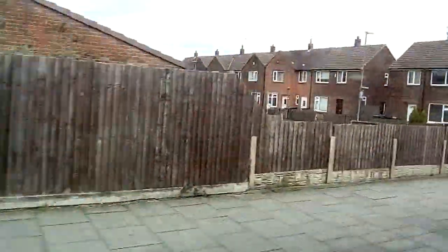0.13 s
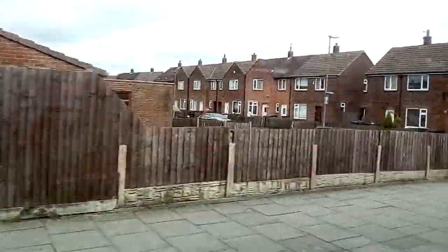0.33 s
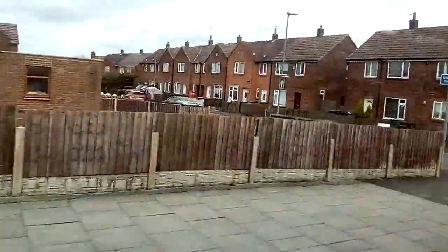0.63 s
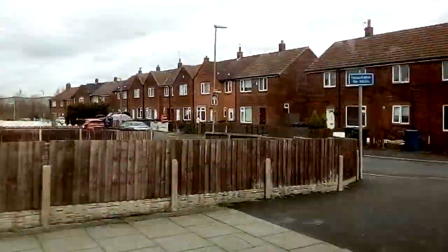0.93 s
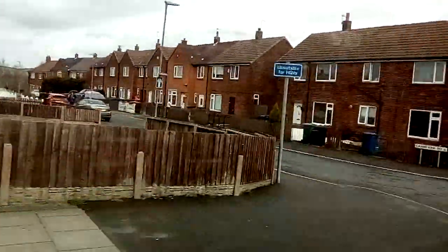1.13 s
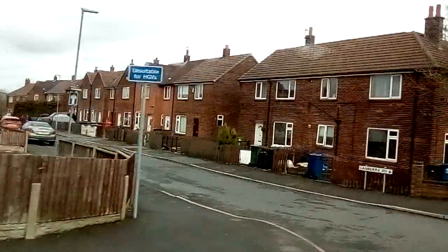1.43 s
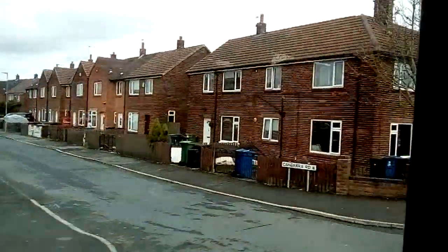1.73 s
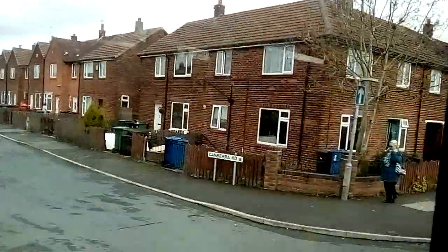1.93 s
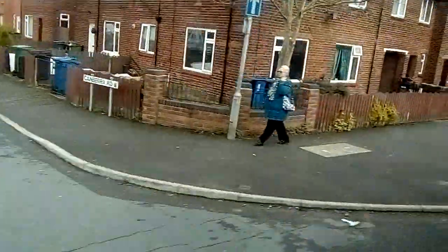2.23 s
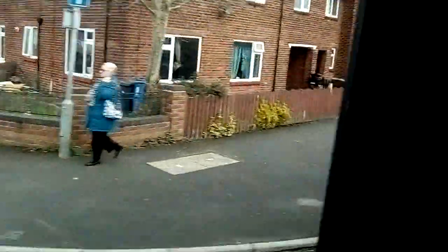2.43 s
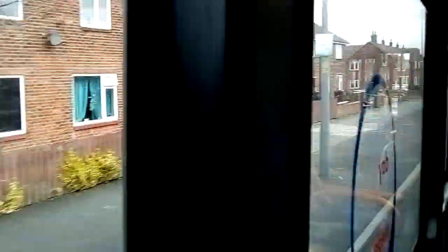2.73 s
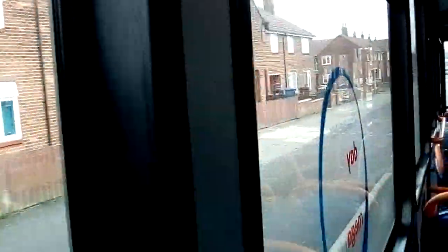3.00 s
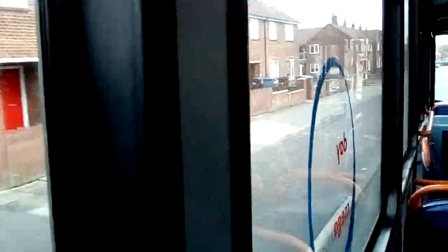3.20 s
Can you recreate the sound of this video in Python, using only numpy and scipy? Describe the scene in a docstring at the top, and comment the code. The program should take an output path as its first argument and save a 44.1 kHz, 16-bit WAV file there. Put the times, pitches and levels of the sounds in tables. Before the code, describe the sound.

A bus diesel engine drones low and steady inside the cabin over booming road rumble; panels and windows rattle busily at first, then ease, with faint high squeaks midway, picked up close in stereo from a seat.

```python
"""The diesel of a bus drones in low shaft orders as it rolls slowly round a corner, heard from inside.
The road booms through the floor and roars in the cabin: shaped noise with drifting patches.
Loose panels and windows rattle over bumps: dense random clicks ring a panel response and a short tail.
Faint squeaks are narrow tones with a little resonant noise.
Two microphone ports: the left one is nearer and brighter."""
import sys
import numpy as np
from scipy import signal
from scipy.fft import rfft, irfft, next_fast_len
from scipy.io import wavfile
from scipy.ndimage import uniform_filter1d

SR = 44100
rng = np.random.default_rng(int(sys.argv[2]) if len(sys.argv) > 2 else 0)


def dump_mix(stems):
    """Bounce the given channels to the path in sys.argv[1] as a 16-bit WAV at rate SR."""
    frames = np.atleast_2d(stems).T  # one column per channel
    limited = np.clip(frames, -1, 1)  # hard clip at full scale
    pcm = np.round(limited * 32767).astype(np.int16)
    wavfile.write(sys.argv[1], SR, pcm)


def convert_level_to_amplitude(level_db):
    """Map a level in decibels to its linear amplitude factor."""
    exponent = np.asarray(level_db, float) / 20
    return 10 ** exponent


N = 148176
T = np.arange(N) / SR


def evened(x):
    """Scales to rms 1."""
    return x / np.sqrt(np.mean(x ** 2) + 1e-20)


def read(points, hz):
    """Interpolates a spectrum table on a log frequency axis."""
    f, value = np.transpose(points)
    return np.interp(np.log(hz + 1), np.log(f + 1), value)


def curve(table, axis):
    """One column of a time table, interpolated per sample."""
    table = np.array(table)
    return np.interp(T, table[:, 0], table[:, axis])


def slow(top_hz):
    """Random fluctuation of rms 1, rolled off above top_hz."""
    z = rfft(rng.standard_normal(N))
    rolloff = 1 + (np.fft.rfftfreq(N, 1 / SR) / top_hz) ** 4
    return evened(irfft(z / rolloff, N))


def wash(colour, patchy_db, size):
    """Two unrelated noises of one colour with shared drifting patches; joint rms 1."""
    hop = size // 4
    frames, hz = N // hop + 5, np.fft.rfftfreq(size, 1 / SR)
    a, b, c, d, patches = rng.standard_normal((frames, len(hz), 5)).T
    patches = uniform_filter1d(patches, size=12, axis=0)  # along frequency
    patches = evened(uniform_filter1d(patches, size=10, axis=1))  # along time
    gain = convert_level_to_amplitude(read(colour, hz)[:, None] + patchy_db * patches)
    z = np.array([a + 1j * b, c + 1j * d]) * gain
    return evened(signal.istft(z, nperseg=size, noverlap=size - hop)[1][:, :N])


def engine():
    """Sine orders of one drifting shaft speed, each wavering in level; order 8 swells once."""
    # Each row: time in seconds, base order in Hz before drift.
    speed = [(0, 42.5), (.4, 41.9), (.65, 42.4), (1.2, 41.9), (1.8, 41.4), (2.6, 41.2), (3.1, 40.9),
             (3.36, 40.4)]
    # Each row: time in seconds, then rms levels of order 3 (boom), order 4 and order 6 (drone) in dB,
    # before waver.
    main_orders = [(0.05, -37.5, -50, -17), (0.09, -21.5, -22, -17.5), (0.25, -25.5, -27.5, -17),
                   (0.41, -22.5, -26.5, -18.5), (0.49, -34, -32, -33), (0.56, -41.5, -24.5, -18),
                   (0.66, -25.5, -34, -20.5), (0.76, -22, -22, -22), (0.84, -36, -32.5, -18.5),
                   (1.22, -41, -17, -22.5), (1.28, -10.5, -38.5, -19.5), (1.33, -28.5, -22.5, -23),
                   (1.48, -26, -32, -18.5), (1.65, -24.5, -23, -24.5), (1.92, -28.5, -34, -22),
                   (2.11, -22, -26, -25.5), (2.81, -24, -26.5, -27), (2.99, -21.5, -68.5, -23),
                   (3.15, -27, -22, -25), (3.2, -19, -30.5, -36), (3.24, -19.5, -38.5, -23),
                   (3.3, -22, -23.5, -24.5)]
    # Weaker orders. Each row: multiple of the base order, rms level in dB before waver and swell.
    weak_orders = [(1, -34), (1.5, -34), (2, -28.5), (5, -39.5), (8, -41), (9, -44), (12, -46.5)]
    drift_fraction, drift_hz = 0.0062, 5
    waver_db, waver_hz = 0.5, 15.8
    swell_s, swell_length_s, swell_peak_db = 0.97, 0.038, 17

    base_hz = curve(speed, axis=1) * (1 + drift_fraction * slow(drift_hz))
    turns = 2 * np.pi * np.cumsum(base_hz) / SR
    swell_db = swell_peak_db * np.exp(-((T - swell_s) / swell_length_s) ** 2)
    orders = [(k, curve(main_orders, axis)) for axis, k in enumerate((3, 4, 6), 1)] + weak_orders
    out = np.zeros(N)
    for k, db in orders:
        order_db = db + (k == 8) * swell_db + waver_db * slow(waver_hz)
        out += np.sqrt(2) * convert_level_to_amplitude(order_db) * np.sin(k * turns + 2 * np.pi * rng.random())
    return out


def road():
    """Floor boom following the road surface plus cabin roar swelling with load, both shaped noise."""
    # Road under the wheels. Each row: time in seconds, roughness in dB before boom_db.
    surface = [(0.0, -22), (0.21, -33), (0.32, -25), (0.43, -19), (0.54, -20.5), (1.08, -19.5),
               (1.09, -21.5), (1.71, -21), (1.88, -26), (2.08, -20), (2.19, -28.5), (3.12, -24.5),
               (3.14, -17), (3.18, -23.5), (3.31, -29.5), (3.36, -27.5)]
    # Floor boom spectrum. Each row: frequency in Hz, relative density in dB per Hz.
    floor = [(20, -22.5), (40, -11), (75, 2), (110, 3), (160, -1), (220, -3), (330, -18), (450, -15.5),
             (700, -60), (1500, -120)]
    # Roar over time. Each row: time in seconds, level in dB before roar_db.
    load = [(0.05, -31), (0.23, -33.5), (0.98, -34), (1.33, -30), (1.56, -33), (1.75, -34), (2.03, -32.5),
            (2.99, -33), (3.3, -34.5)]
    # Cabin roar spectrum. Each row: frequency in Hz, relative density in dB per Hz.
    roar_colour = [(150, -31), (260, -4), (291, -6), (443, -20.5), (496, -15), (666, -18), (988, -22),
                   (1270, -29), (3040, -38.5), (3910, -46), (6310, -50), (7470, -64.5), (9710, -95),
                   (16400, -120)][:-2] + [(8200, -69), (10400, -69.5), (13900, -77), (14500, -65),
                   (15600, -67.5), (16100, -73.5)]
    boom_db, roar_db = 2, 4.5

    boom = convert_level_to_amplitude(curve(surface, axis=1) + boom_db) * wash(floor, patchy_db=1.4, size=2048)
    roar = convert_level_to_amplitude(curve(load, axis=1) + roar_db) * wash(roar_colour, patchy_db=1.7, size=1024)
    return boom + roar


def clack():
    """One minimum-phase panel knock of unit energy, split into body, middle and bright parts."""
    # Panel ringing. Each row: frequency in Hz, relative density in dB per Hz.
    panel = [(200, -33.5), (350, -10.5), (500, -11.5), (700, -11.5), (900, -12), (1100, -15), (1350, -18),
             (1550, -17), (1720, -11.5), (1880, -17), (2050, -19.5), (2400, -22), (3000, -21), (3600, -27),
             (4200, -33.5), (5500, -38.5), (6700, -39.5), (7500, -48.5), (8400, -56.5), (10200, -57),
             (13400, -64), (14900, -56.5), (16100, -64)]
    body_hz, bright_hz = 1300, 3800

    hz = abs(np.fft.fftfreq(4096, 1 / SR))
    low = 1 / (1 + (hz / body_hz) ** 8)
    high = 1 - 1 / (1 + (hz / bright_hz) ** 8)
    gain = convert_level_to_amplitude(np.maximum(read(panel, hz), -100))
    causal = np.exp(np.conj(signal.hilbert(np.log(gain))))
    tick = causal / np.sqrt(np.mean(gain ** 2))
    parts = np.fft.ifft(tick * np.array([low, 1 - low - high, high])).real
    return np.roll(parts, 32, axis=1)[:, :2048]  # room for the split's pre-ringing


def clicks(per_s, spread_db):
    """Dense random-sign clicks with exponentially spread dB levels, so a few are large; rms 1."""
    draw = rng.random((3, N))
    sign = (draw[0] < per_s / SR) * np.sign(draw[1] - .5)
    return evened(sign * convert_level_to_amplitude(-spread_db * np.log(draw[2] * .99 + .01)))


def cabin(x):
    """Short noise tails, crossfaded in rotation through six random pairs: no one colours every knock."""
    t60_s, shifts_per_s, gap_s = 0.061, 9.5, .001
    t = np.arange(SR // 4) / SR
    tails = rng.standard_normal((6, 2, len(t))) * convert_level_to_amplitude(-60 * t / t60_s) * (t > gap_s)
    tails /= np.linalg.norm(tails[0, 0])
    phase = (shifts_per_s * T - np.arange(6)[:, None]) % 6 - 1
    share = np.cos(np.pi / 2 * np.clip(phase, -1, 1))
    return signal.oaconvolve((x * share)[:, None], tails, axes=2)[:, :, :N].sum(0)


def rattles():
    """Click bursts over bumps and a rising and falling trim rattle ring the panels and a short tail."""
    # Each row: start in seconds, level in dB before rattle_db, Gaussian decay length in seconds,
    # extra brightness in dB, extra body in dB.
    bumps = [(0.038, -25.5, 0.015, -11, 2.3), (0.277, -28.5, 0.04, -4, 1.2), (0.319, -29, .015, 9, 3.5),
             (0.426, -26.5, 0.022, -5.5, 0.5), (0.459, -26, 0.033, -2, -0.5), (0.515, -23, .035, -4.5, -1),
             (0.535, -26, 0.046, 1, -5.5), (0.626, -31, 0.017, -5, 6.5), (0.716, -28.5, 0.026, 5.5, 3.5),
             (0.778, -26.5, 0.023, 8.5, -0.5), (0.809, -29, 0.023, 4.5, -7.5), (0.817, -27, 0.037, 7, -7.5),
             (0.942, -21.5, 0.0084, 0, -8.5), (1.021, -32, .03, -1.5, 0.5), (1.078, -25.5, .025, 4.5, 6),
             (1.101, -30.5, 0.02, 0.5, -4.5), (1.137, -23.5, 0.029, 5, 1.5), (1.188, -27.5, 0.016, 0, -2),
             (1.218, -23, .03, -1, 3.5), (1.25, -26.5, 0.035, 4.5, -1), (1.303, -27.5, 0.024, -2.5, -1),
             (1.355, -23, .023, -5, -1), (1.376, -24.5, .045, 2.5, -0.7), (1.442, -20.5, 0.043, 0.5, -4),
             (1.466, -29.5, 0.073, 6, -2), (1.582, -30.5, 0.015, 5, -10.5), (1.75, -36, .03, 9.5, -6.5),
             (1.8365, -34, .06, 6.5, 0.5), (1.906, -31.5, .03, 6, 6), (2.145, -33, 0.015, -1, 8),
             (2.341, -37.5, 0.013, 0, 10), (2.7052, -24.5, 0.009, 5.5, 9), (2.7127, -24, 0.02, 4.5, -1),
             (2.987, -34, 0.013, -3.5, 5)]
    # Continuous loose trim rattle. Each row: time in seconds, drive level in dB.
    trim = [(0.08, -45.5), (0.31, -51), (0.64, -45), (0.87, -47), (1.08, -40), (1.26, -37.5), (1.36, -45),
            (1.52, -50), (1.68, -58), (2.08, -43), (2.38, -46.5), (2.88, -52), (3.3, -45.5)]
    rattle_db, first_db, rise_s = -8, 16, .001  # first_db: opening knock over its burst
    tail_gain = convert_level_to_amplitude(-2.4)

    burst, first = np.zeros((3, N)), np.zeros((3, N))
    for start_s, db, length_s, bright_db, body_db in bumps:
        bands = convert_level_to_amplitude(db + rattle_db + np.array([[body_db], [0], [bright_db]]))
        u = np.maximum(T - start_s, 0)
        burst += bands ** 2 * np.minimum(u / rise_s, 1) * np.exp(-(u / length_s) ** 2)
        first[:, round(start_s * SR)] = bands[:, 0] * convert_level_to_amplitude(first_db)
    drive = first + np.sqrt(burst) * clicks(per_s=1100, spread_db=3.5)
    drive += convert_level_to_amplitude(curve(trim, axis=1)) * clicks(per_s=1500, spread_db=2.5)
    direct = signal.oaconvolve(drive, clack(), axes=1)[:, :N].sum(0)
    tail = cabin(direct)
    return np.array([direct + tail_gain * tail[0], np.hypot(1, tail_gain) * tail[1]])


def resonate(x, hz, width_hz):
    """A fixed one-pole resonance of gain 1, run at baseband."""
    turn = np.exp(2j * np.pi * hz * np.arange(len(x)) / SR)
    r = np.exp(-np.pi * width_hz / SR)
    return 2 * (turn * signal.lfilter([1 - r], [1, -r], x / turn)).real


def squeaks():
    """Short chirps of something rubbing: fixed-pitch sines roughened by narrow resonant noise."""
    # Each row: start in seconds, length in seconds, tone level in dB, pitch in Hz.
    chirps = [(1.45, .1, -53, 3600), (1.56, .07, -56, 3600), (1.65, .09, -57, 3600), (1.72, .09, -51, 3598),
              (1.80, .065, -48, 3595), (1.865, .065, -48, 3597), (1.925, .065, -50, 3597),
              (2.01, .05, -53, 3605), (2.13, .07, -56, 3590), (1.85, .16, -57, 2975),
              (2.25, .24, -55, 2975), (2.535, .12, -52, 2970)]
    width_hz, roughness = 33, 0.15

    out, noise = np.zeros(N), rng.standard_normal(N)
    for start_s, length_s, db, hz in chirps:
        shape = np.sin(np.pi * np.clip((T - start_s) / length_s, 0, 1)) ** .6
        tone = np.sqrt(2) * np.sin(2 * np.pi * hz * T)
        tone += roughness * evened(resonate(noise, hz, width_hz))
        out += convert_level_to_amplitude(db) * shape * tone
    return out


def scene():
    """Row 0 is the sound at the seat, row 1 a share only the right port adds (half engine and squeaks)."""
    return road() + rattles() + (engine() + squeaks()) * np.array([[1], [.5]])


def top_cut(x):
    """Nothing passes above the cut-off."""
    return signal.sosfilt(signal.butter(12, 15700, fs=SR, output="sos"), x)


def record(dry):
    """The port pair: likeness, balance and phase lead by frequency, then a band limit."""
    # Each row: frequency in Hz, likeness of the ports from 0 to 1.
    likeness = [(60, 1), (140, 0.89), (240, 1), (340, .9), (520, 0.42), (1000, 0.2), (2000, 0.083),
                (4000, 0.067), (7200, 0.067), (8200, 0.27), (16000, 0.5)]
    # Each row: frequency in Hz, left over right balance in dB.
    balance = [(25, -4.3), (60, 4.5), (100, -1.5), (170, -1.5), (290, -0.3), (500, -2), (850, -3),
               (1440, 2), (2440, 9.5), (4140, 7), (7020, 9), (8400, 4.2), (16000, 2.3)]
    # Each row: frequency in Hz, phase in radians by which the left port leads.
    lead = [(0, 0), (60, .05), (250, .3), (430, .5), (690, 1.1), (1120, 3.2), (1460, 3.9), (2070, 7.0),
            (7200, 23.3), (7900, 8 * np.pi), (22050, 8 * np.pi)]
    edge_hz = 15700

    size = next_fast_len(N + 64)
    hz = np.fft.rfftfreq(size, 1 / SR)
    seat, extra = rfft(dry, size)
    same = np.clip(read(likeness, hz), 0, 1)
    tilt = convert_level_to_amplitude(read(balance, hz) / 2)
    late = np.exp(-1j * np.interp(hz, *np.transpose(lead)))
    left = seat * tilt
    right = (same * seat + np.sqrt(1 - same ** 2) * extra) * late / tilt
    pair = np.array([left, right]) * (hz < edge_hz)
    return top_cut(irfft(pair, size)[:, :N])


dry = scene()
out = record(dry)
dump_mix(out)
```